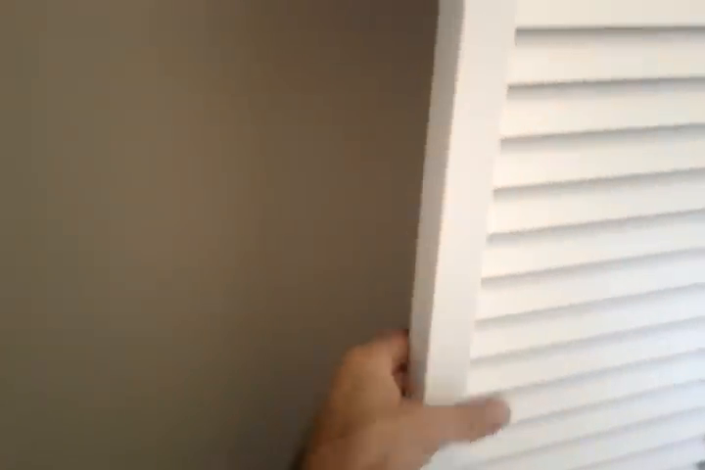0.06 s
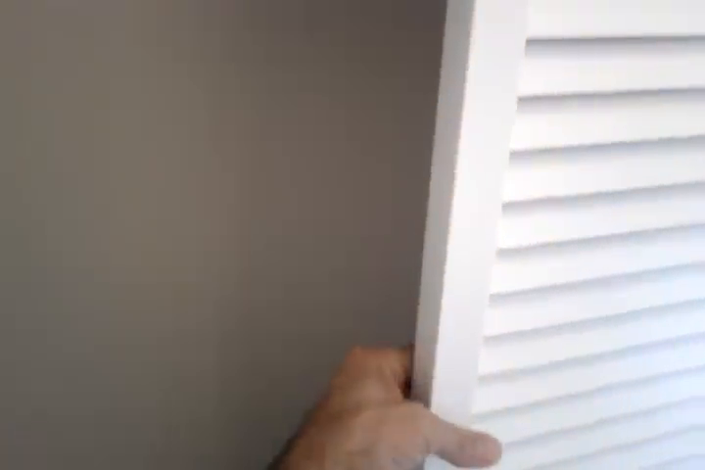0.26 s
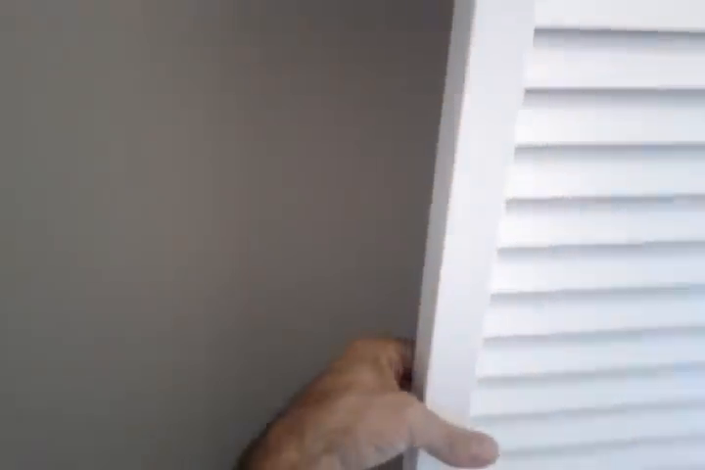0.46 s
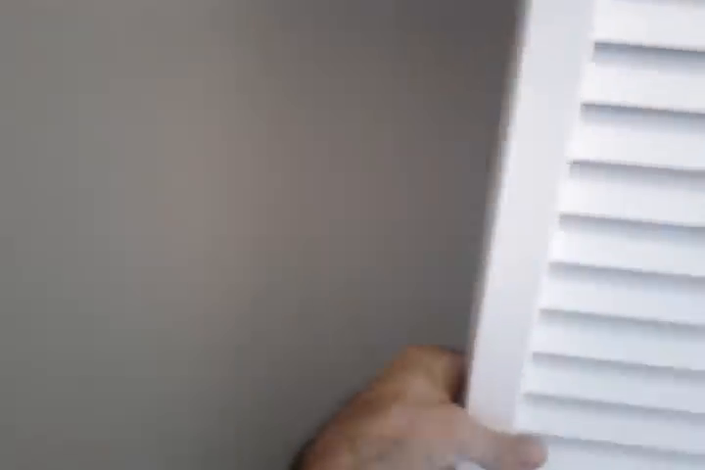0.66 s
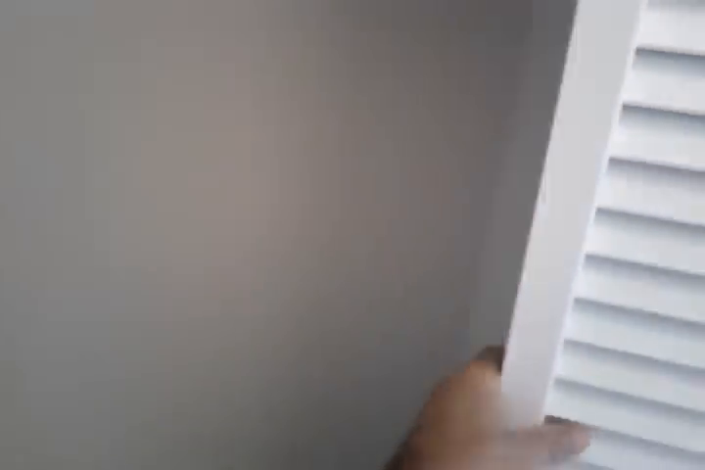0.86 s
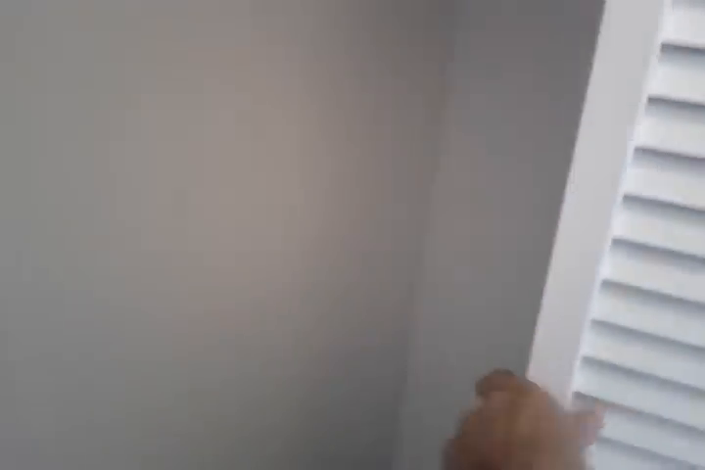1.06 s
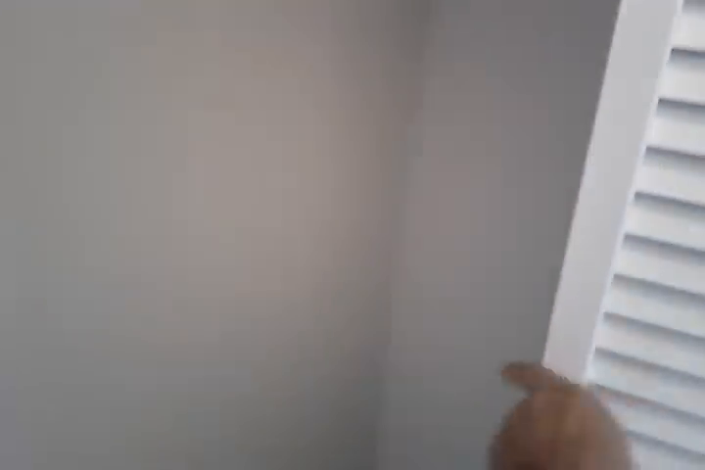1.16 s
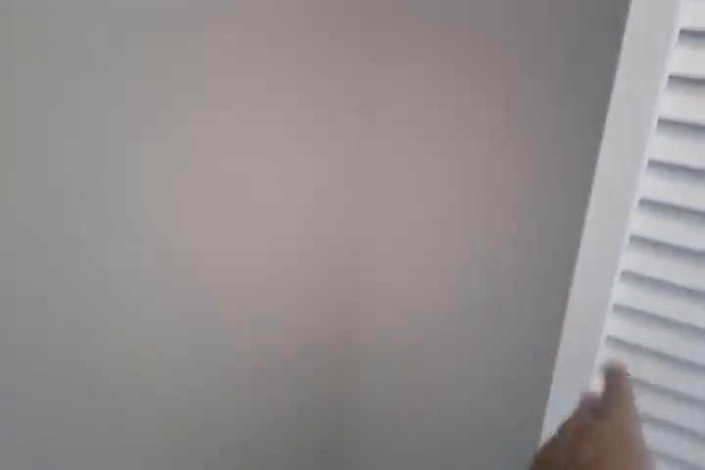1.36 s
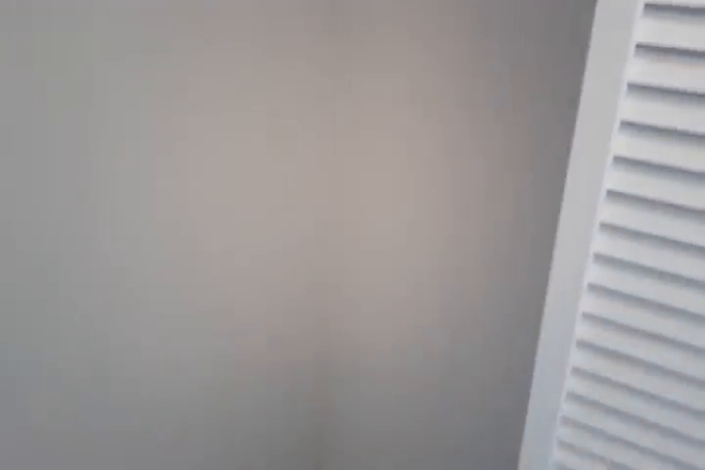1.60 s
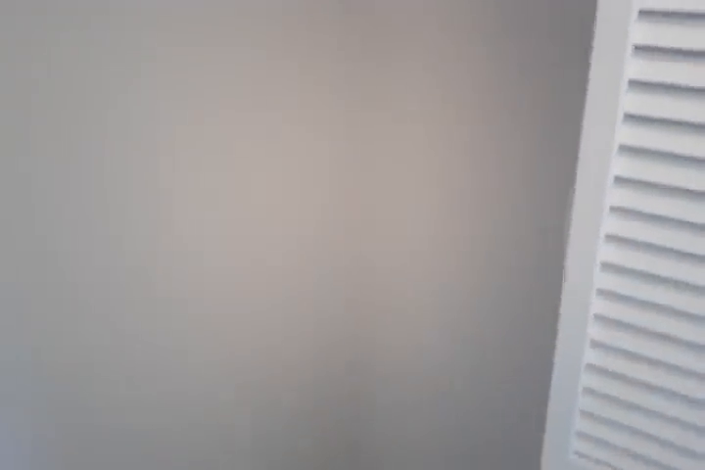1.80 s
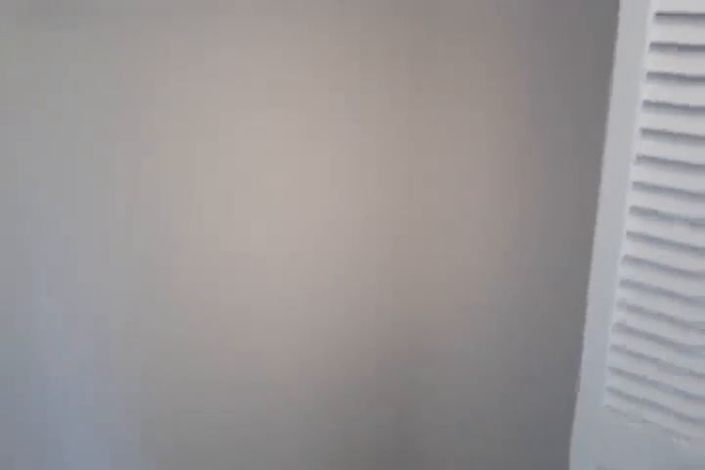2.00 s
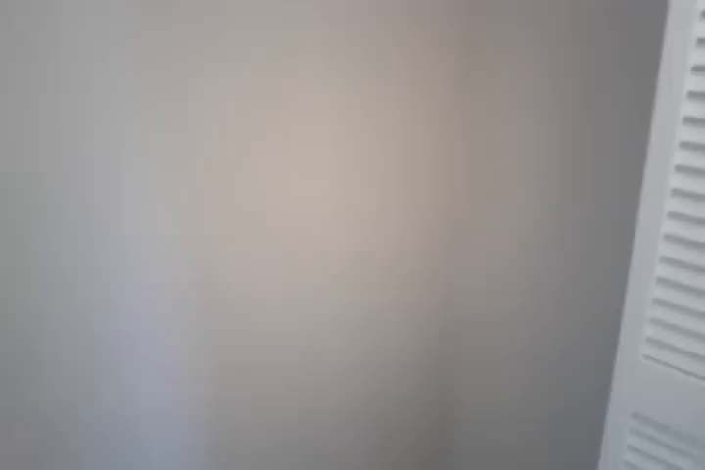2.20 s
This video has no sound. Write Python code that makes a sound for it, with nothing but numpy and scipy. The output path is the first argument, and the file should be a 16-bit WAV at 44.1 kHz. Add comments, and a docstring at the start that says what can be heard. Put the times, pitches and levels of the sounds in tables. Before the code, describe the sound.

A louvered wooden door clacks sharply, then rumbles and scrapes along its track.

```python
"""First comes a soft rub over a steady hiss, then sharp clacks and dull thumps: a hand pushes a folding
louvered wooden door aside in an empty room. The clacks ring in the slats as the door comes unstuck.
Then its guide rubs along the track, sticking and slipping: the panels rumble, the guide groans and
scrapes, and the wood chafes thinly as the door slows to rest."""
import sys
import numpy as np
from scipy import signal
from scipy.fft import rfft, irfft
from scipy.io import wavfile
from scipy.ndimage import uniform_filter1d

SR = 44100
rng = np.random.default_rng(int(sys.argv[2]) if len(sys.argv) > 2 else 0)


def waveform_to_disk(signal):
    """Save audio, clipped to [-1, 1], as 16-bit WAV at the path in sys.argv[1]."""
    frames = np.transpose(np.atleast_2d(signal))
    scaled = np.clip(frames, -1, 1) * 32767
    samples = np.round(scaled).astype(np.int16)
    wavfile.write(sys.argv[1], SR, samples)


N = 99225
TIME = np.arange(N) / SR
FREQS = np.maximum(np.arange(N // 2 + 1) * SR / N, 1)

# how long the room takes to fade by 60 dB, its "T60" (frequency [Hz], time [s])
ROOM_T60 = [(100, 0.53), (500, 0.92), (1500, 0.56), (3700, 0.49), (6000, 0.52), (9000, 0.25)]
# the tone colour of each noise (frequency [Hz], relative level [dB])
HISS_COLOUR = [(25, -22), (50, -8), (90, 0.5), (140, 3), (250, 9.5), (500, 9), (1000, 0.5), (2000, 3),
               (4000, -3.5), (6300, -0.5), (9000, -26)]
THUMP_COLOUR = [(25, -14), (50, -2.5), (85, -4), (130, -3), (210, 4), (300, -11), (600, -52)]
RUB_COLOUR = [(500, -12.5), (1000, -5), (2000, -4.5), (3000, -4), (4200, 1), (6000, -3.5), (7300, -7),
              (9000, -32.5)]
CRACK_COLOUR = [(400, -17.5), (1000, -9.5), (1700, -1), (3600, 0.5), (6000, 4.5), (7500, -6.5), (8600, -30)]
CLACK_ECHO_COLOUR = [(250, -8), (700, -13), (1200, -10), (1900, 2), (2800, -11), (3800, 2), (4900, 1),
                     (5900, 2), (7200, -7), (9000, -41)]
# modes, the notes a part likes to ring at (pitch [Hz], width [Hz], relative level [dB])
WHOLE_DOOR_MODES = [(84.7, 11, -7), (126, 40, -11)]
DEEP_PANEL_MODES = [(182.4, 8.1, 0.5), (221.6, 5.4, 2)]
MIDDLE_PANEL_MODES = [(266, 19, -15.5), (326.6, 7, 0.5), (386, 20, -3.5), (422.4, 10, 1.5), (473, 26, -6.5),
                      (508.6, 6.4, 0.5)]
TRACK_MODES = [(692, 74, -6.5), (870, 47, 3.5), (891, 98, 0), (1066, 140, -7), (1192, 57, -6),
               (1344, 50, -3.5), (1483, 58, -4), (1658, 130, -7.5), (2396, 470, -8.5)]
SINGING_MODES = [(854, 9.7, -6), (1014, 6.9, 0.5), (1377, 10, -6.5)]  # the track under the hardest push
# how loud each sliding sound is (time [s], level [dB])
DEEP_PANEL_LEVEL = [(0.57, -87), (0.63, -46.5), (0.72, -50), (0.77, -37.5), (0.815, -49), (0.86, -49),
                    (0.905, -31), (0.97, -48), (1.085, -54.5), (1.17, -39), (1.23, -43.5), (1.3, -52),
                    (1.385, -44.5), (1.46, -64), (1.53, -53.5), (1.7, -77), (2.08, -68.5), (2.125, -59),
                    (2.18, -73)]
MIDDLE_PANEL_LEVEL = [(0.2, -65), (0.57, -58), (0.635, -35), (0.69, -38.5), (0.76, -39), (0.83, -45.5),
                      (0.91, -47.5), (0.98, -53), (1.11, -50), (1.18, -42.5), (1.28, -44), (1.38, -38),
                      (1.52, -48.5), (1.6, -49), (1.67, -58.5), (2.08, -70), (2.125, -55.5), (2.18, -64)]
SCRAPE_LEVEL = [(0.25, -72), (0.5, -55), (0.61, -41), (0.71, -48), (0.77, -37), (0.845, -49.5), (0.88, -34),
                (0.915, -39), (0.96, -40.5), (1.09, -47.5), (1.2, -43.5), (1.39, -52), (1.42, -40.5),
                (1.48, -53.5), (1.66, -55.5), (2.0, -60.5)]
SINGING_LEVEL = [(0.68, -65), (0.78, -41.5), (0.845, -59.5), (0.897, -30.5), (1.08, -73.5)]
RUB_LEVEL = [(0, -48), (0.12, -48.5), (0.2, -46.5), (0.55, -46.5), (0.74, -50), (0.85, -44.5), (0.89, -41),
             (0.97, -44), (1.05, -45.5), (1.115, -41.5), (1.17, -49), (1.26, -47), (1.32, -46),
             (1.405, -38.5), (1.52, -50.5), (1.72, -57), (1.82, -48), (1.93, -54), (2.08, -64)]
# the hand bumps the panel (time [s], level [dB])
THUMPS = [(0.157, -47), (0.298, -44)]
# wood brushes wood (time [s], length [s], pitch [Hz], width [Hz], level [dB])
CHAFES = [(0.42, 0.026, 1480, 1210, -39), (0.862, 0.0091, 2240, 906, -39),
          (1.234, 0.043, 3870, 1180, -44.5), (1.407, 0.016, 876, 280, -41.5),
          (1.416, 0.068, 3920, 990, -45), (1.737, 0.018, 880, 203, -47.5), (1.769, 0.045, 1960, 177, -55)]
# the guide catches and groans
# (time [s], length [s], start pitch [Hz], end pitch [Hz], level [dB], roughness [share of pitch])
GROANS = [(0.6, 0.064, 695, 637, -39, 0.045), (0.769, .055, 518, 501, -29.5, .012),
          (0.838, .018, 510, 505, -39, .012), (0.984, 0.046, 510, 506, -43.5, 0.04),
          (1.224, 0.053, 504, 504.6, -35.5, 0.023), (1.314, 0.134, 505, 498, -43, 0.04),
          (1.544, 0.135, 321.6, 333.7, -45.5, 0.0597)]
# a groan's first three harmonics (relative level [dB])
GROAN_HARMONICS = [2.5, -13, -17.5]
# the door clacks (time [s], level [dB], brightness [dB per octave], contact pitch [Hz], snap boost [dB])
CLACKS = [(0.1485, -32, -3.5, 3720, 1), (0.2225, -21, 2, 4700, -0.5), (0.2932, -29, -2, 4960, 3),
          (0.305, -13, -0.57, 3666, 3), (0.591, -28.5, -10.5, 3570, -0.5), (0.867, -30.5, -9.5, 2080, -2),
          (0.927, -34.5, -4, 3280, 0.5), (1.411, -33.5, -1.5, 4220, 1.5), (1.421, -34, -5, 4470, 3.5)]
# the ring of the slats (pitch [Hz], relative level [dB])
SLAT_NOTES = [(1495, -5.5), (1835, -8), (1972, -6.5), (2251, 4), (3359, -10), (3526, 1.5), (3568, 1),
              (3677, -1), (3751, 3), (3842, 6.5), (4176, 9), (4410, -0.5), (4915, -4), (5840, 5.5)]

SLIPS_PER_S, SLIP_SPREAD_DB = 1100, 3.5
FADE_S, CLACK_RISE_S = 0.013, 0.00099
TICK_DB, FRAME_DB, SLATS_DB = 5, -9.5, -26.5  # the balance inside a clack
FRAME_HZ, CUTOFF_HZ = 1820, 8700


def amp(db):
    """Turn decibels into a gain."""
    return 10 ** (np.asarray(db) / 20)


def unit(x):
    """Scale to an average power of 1."""
    return x / np.sqrt(np.mean(x ** 2) + 1e-20)


def level(rows):
    """Gain over time from rows of (time [s], level [dB])."""
    return amp(np.interp(TIME, *np.transpose(rows)))


def across_freqs(points):
    """Spread a table over all frequencies, with the octaves evenly spaced."""
    hz, values = np.transpose(points)
    return np.interp(np.log(FREQS), np.log(hz), values)


def brighter(hz, tilt_db):
    """Gain that slopes by tilt_db per octave in the treble and is flat on either side."""
    low_hz, high_hz = 2080, 5840
    return amp(tilt_db * np.log2(np.clip(hz, low_hz, high_hz) / np.sqrt(low_hz * high_hz)))


def coloured(x, colour, tilt_db=0):
    """Give a sound a tone colour, made brighter or duller by tilt_db."""
    return unit(irfft(rfft(x) * amp(across_freqs(colour)) * brighter(FREQS, tilt_db), N))


def band(x, low_hz, high_hz, order):
    """Keep what lies between two frequencies."""
    return signal.sosfilt(signal.butter(order, [low_hz, high_hz], "band", fs=SR, output="sos"), x)


def noise():
    """White noise."""
    return rng.standard_normal(N)


def drift(rate_hz):
    """A smooth random wander."""
    return unit(irfft(rfft(noise()) / (1 + (FREQS / rate_hz) ** 2), N))


def dying(start, rise_s, t60_s):
    """The loudness of a blow: a quick rise, then a fade."""
    age = np.maximum(TIME - start, 0)
    return np.minimum(age / rise_s, 1) * np.exp(-np.log(1000) * age / t60_s)


def resonate(x, modes):
    """Let a sound ring in each mode, then add them up with every second one flipped."""
    out = 0
    for k, (hz, width, db) in enumerate(modes):
        decay = np.exp(-np.pi * width / SR)
        feedback = [1, -2 * decay * np.cos(2 * np.pi * hz / SR), decay * decay]
        out += (-1) ** k * amp(db) * signal.lfilter([1 - decay, 0, decay - 1], feedback, x)
    return unit(out)


def steady(x, span_s):
    """Even out the chance swells of a sound."""
    return x / np.sqrt(np.maximum(uniform_filter1d(x ** 2, int(span_s * SR)), 1e-6))


def humming(x, modes, span_s):
    """Rubbing keeps modes ringing, each holding its own share of the sound."""
    return unit(sum(amp(db) * steady(resonate(x, [(hz, width, 0)]), span_s) for hz, width, db in modes))


def slips():
    """Rubbing is a dense run of tiny slips of uneven size."""
    sizes = amp(SLIP_SPREAD_DB * np.minimum(rng.exponential(1, N), 4)) * rng.choice([-1, 1], N)
    return unit(sizes * (rng.random(N) < SLIPS_PER_S / SR))


def hiss():
    """The room's faint, steady hiss."""
    return amp(-57) * coloured(noise(), HISS_COLOUR)


def room_tail(x, start):
    """Let a noise die away from a given time, each band at the room's own rate."""
    spectrum, centres = rfft(x), [hz for hz, _ in ROOM_T60]
    out = 0
    for share, (_, t60_s) in zip(np.eye(len(centres)), ROOM_T60):
        one_band = irfft(spectrum * across_freqs(list(zip(centres, share))), N)
        out += one_band * dying(start, 0.0066, t60_s)
    return out


def in_room(x, echo_db):
    """Add the echo of the bare walls, keeping about the same power."""
    tail = unit(room_tail(noise(), 0.003)) / np.sqrt(N)
    echo = amp(echo_db) * signal.fftconvolve(x, tail)[:N]
    return (x + echo) / np.sqrt(1 + amp(echo_db) ** 2)


def thumps():
    """A bump of the hand sets the whole panel booming briefly."""
    out = 0
    for start, db in THUMPS:
        boom = steady(coloured(noise(), THUMP_COLOUR), span_s=0.023)
        out += amp(db) * boom * dying(start, rise_s=0.0061, t60_s=0.52)
    return out


def chafes():
    """Wood brushes its frame in short scuffs and hoarse squeaks that trail off in the room."""
    out, t60_s = 0, 0.38
    for start, length, hz, width, db in CHAFES:
        fade_in = np.clip((TIME - start) / FADE_S + .5, 0, 1)
        fade_out = np.exp(-np.log(1000) * np.maximum(TIME - start - length, 0) / t60_s)
        scuff = resonate(in_room(slips(), echo_db=8), [(hz, width, 0)])
        squeak = resonate(scuff, [(hz, 2 * width, 0)])
        out += amp(db) * fade_in * fade_out * steady(squeak, span_s=0.0094)
    return out


def panels():
    """The slips of the guide set the panels rumbling and the whole door humming."""
    deep, middle = level(DEEP_PANEL_LEVEL), level(MIDDLE_PANEL_LEVEL)
    rumble = 0
    for gain, modes in [(deep, DEEP_PANEL_MODES), (middle, MIDDLE_PANEL_MODES)]:
        ringing = humming(slips(), modes, span_s=0.03)
        rumble += gain * unit(band(ringing, 160, 560, order=3))
    hum = humming(band(slips(), 62, 200, order=3), WHOLE_DOOR_MODES, span_s=0.05)
    push = np.hypot(deep, middle) / amp(-39)  # 1 at the panels' usual level
    return rumble + amp(-55.5) * np.tanh(push) * hum  # the hum swells less than the rumble


def track():
    """The guide scrapes in the ringing track, which sings when pushed hard; a soft rub lies on top."""
    friction = slips()
    ringing = resonate(band(friction, 550, 3000, order=2), TRACK_MODES)
    scrape = level(SCRAPE_LEVEL) * steady(in_room(ringing, echo_db=3.5), span_s=0.02)
    rub = level(RUB_LEVEL) * coloured(in_room(friction, echo_db=11), RUB_COLOUR)
    singing = level(SINGING_LEVEL) * humming(slips(), SINGING_MODES, span_s=0.039)
    return scrape + singing + rub


def groans():
    """Where the slips lock into a rhythm, the guide gives a short tone, clean or rough."""
    pitch_wobble = drift(rate_hz=108.5)
    flutter = amp(2.5 * drift(rate_hz=28))
    out = 0
    for start, length, start_hz, end_hz, db, roughness in GROANS:
        end = start + length
        hz = np.interp(TIME, [start, end], [start_hz, end_hz]) * (1 + roughness * pitch_wobble)
        phase = 2 * np.pi * np.cumsum(hz) / SR
        tone = sum(amp(part_db) * np.sin(k * phase) for k, part_db in enumerate(GROAN_HARMONICS, 1))
        held = np.clip(np.minimum(TIME - start, end - TIME) / FADE_S + .5, 0, 1)  # swell, hold, let go
        out += amp(db) * held * unit(tone)
    return in_room(out * flutter, echo_db=-9.5)


def slats(start, tilt_db):
    """A clack rings the slats, with a slightly different mix of notes each time."""
    notes = 0
    for hz, db in SLAT_NOTES:
        gain = amp(db + rng.normal(0, 3)) * brighter(hz, tilt_db)
        notes += gain * np.sin(2 * np.pi * (hz * TIME + rng.random()))
    return notes * dying(start, CLACK_RISE_S, t60_s=0.3)


def struck_note(start, hz, t60_s):
    """One quickly fading note of struck wood."""
    return np.sin(2 * np.pi * hz * (TIME - start)) * dying(start, CLACK_RISE_S, t60_s)


def clacks():
    """Wood hits wood: a tick, the frame's note and a crack, then the room's echo and ringing slats."""
    out = 0
    for start, db, tilt_db, contact_hz, snap_db in CLACKS:
        tick = amp(TICK_DB) * struck_note(start, contact_hz, t60_s=0.012)
        frame = amp(FRAME_DB) * brighter(FRAME_HZ, tilt_db) * struck_note(start, FRAME_HZ, t60_s=0.013)
        crack = steady(coloured(noise(), CRACK_COLOUR, tilt_db), span_s=0.00087)
        crack *= dying(start, CLACK_RISE_S, t60_s=0.025)
        snap = amp(snap_db) * (tick + frame + crack)
        broad_echo = amp(-12) * coloured(noise(), CLACK_ECHO_COLOUR, tilt_db)
        tick_echo = amp(-21.5) * resonate(noise(), [(contact_hz, 320, 0)])  # 320 Hz wide
        echo = room_tail(broad_echo + tick_echo, start)
        out += amp(db) * (snap + echo + amp(SLATS_DB) * slats(start, tilt_db))
    return signal.sosfilt(signal.butter(2, 200, "high", fs=SR, output="sos"), out)


def scene():
    """The room's hiss and all the sounds of the door, in one channel."""
    return (hiss() + clacks() + thumps() + panels() + track() + groans() + chafes())[None]


def record(dry):
    """Cut off the highest treble steeply."""
    return signal.sosfilt(signal.ellip(10, .2, 80, CUTOFF_HZ, fs=SR, output="sos"), dry)


dry = scene()
out = record(dry)
waveform_to_disk(out)
```